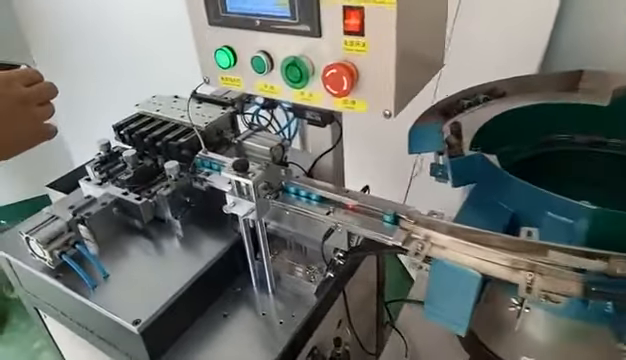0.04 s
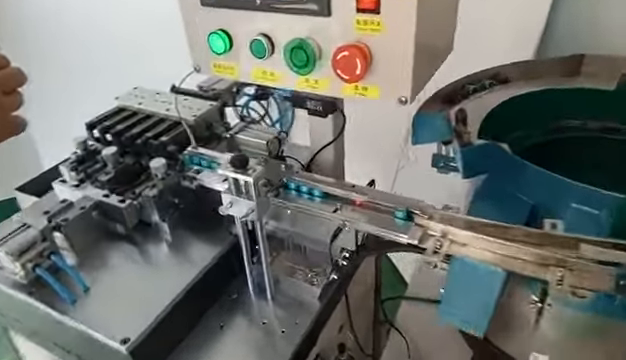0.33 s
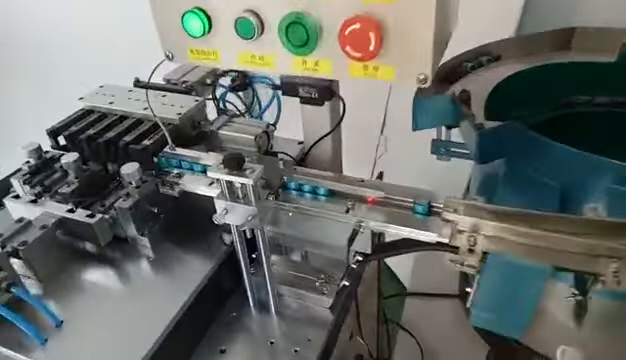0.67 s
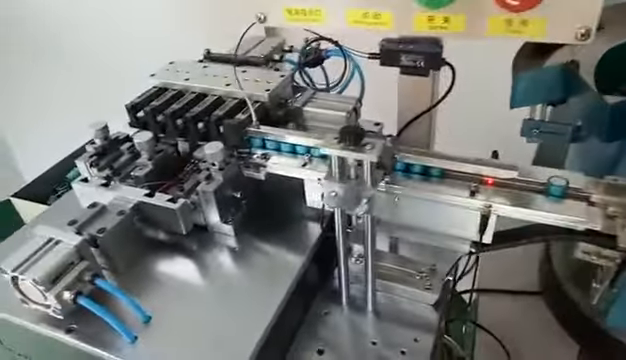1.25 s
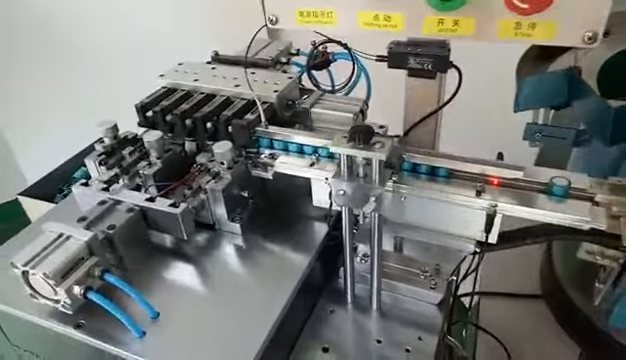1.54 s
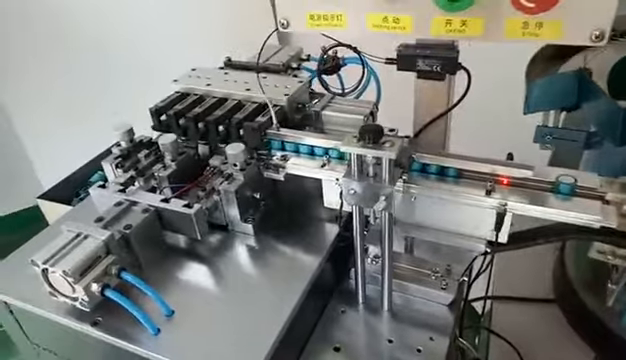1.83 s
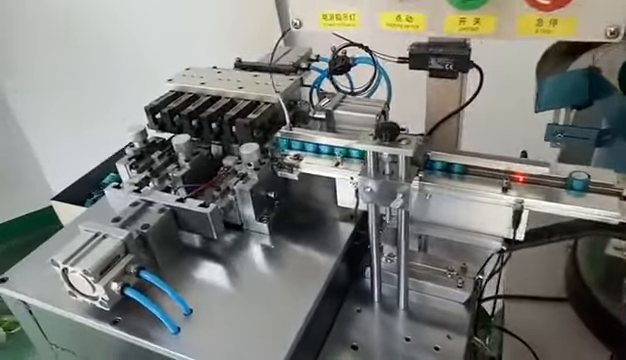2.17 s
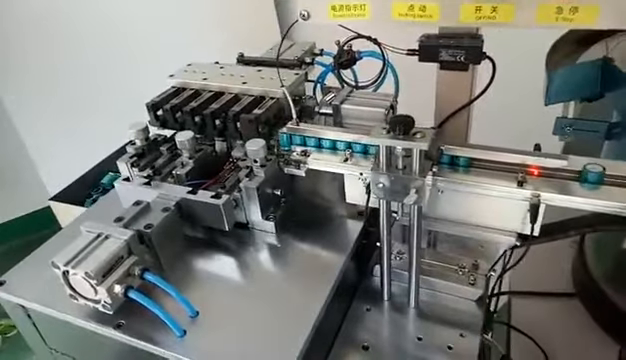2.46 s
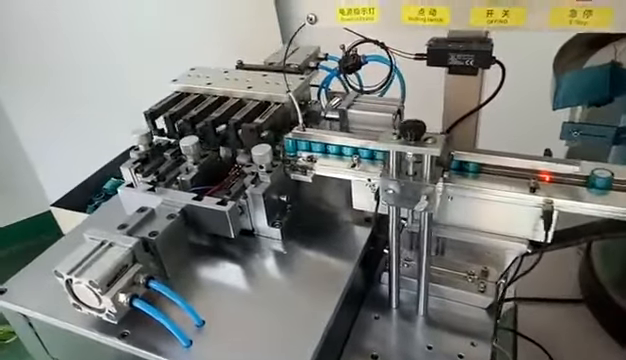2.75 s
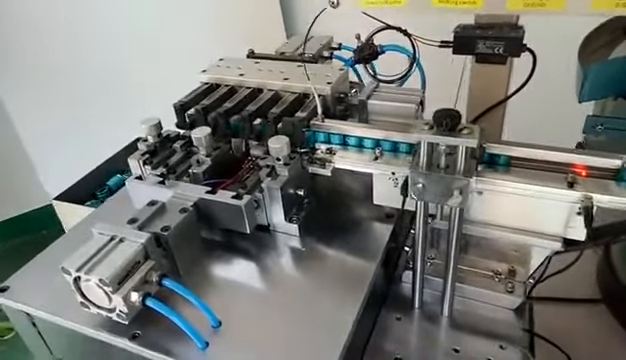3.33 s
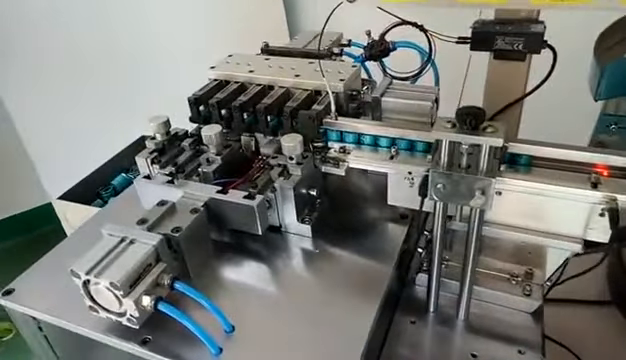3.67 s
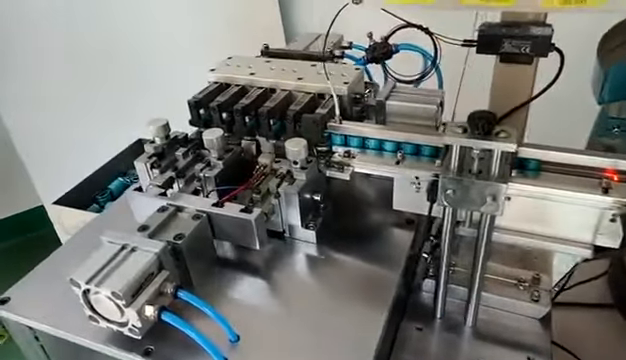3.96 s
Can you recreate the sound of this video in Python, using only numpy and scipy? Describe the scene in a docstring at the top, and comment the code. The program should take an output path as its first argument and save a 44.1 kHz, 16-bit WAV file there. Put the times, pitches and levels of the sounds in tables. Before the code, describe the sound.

A vibrating bowl feeder rattles small parts throughout, close by, over a low hum, with a fine sizzle mostly in the first two seconds. Air cylinders thump irregularly. A slide clacks at 1.1 seconds, steel tinks at 1.5, and the slide chatters with air puffs at 2 and 2.3. Two light pings follow after 3, a double clack at 3.5, then a thump and two puffs near 3.9.

```python
"""A bench assembly machine in a small workshop, heard from close by. From the start its bowl feeder
hums at multiples of the mains rate and tosses small parts, which rattle on the bowl and rail and
sizzle along the track. Air cylinders begin to thump, the slide clacks, and at 1.5 s a steel stop tinks.
After 2 s the slide chatters amid puffs of air. Past 3 s parts ping twice on the track and the slide
clacks twice more; a last thump and two puffs come just before 4 s, over the continuing rattle."""
import sys
import numpy as np
from scipy import signal
from scipy.fft import rfft, irfft, next_fast_len
from scipy.io import wavfile
from scipy.ndimage import map_coordinates

SR = 44100
rng = np.random.default_rng(int(sys.argv[2]) if len(sys.argv) > 2 else 0)


def master(y):
    """Save y as 16-bit WAV."""
    cut = np.clip(np.atleast_2d(y).T, -1, 1)
    pcm = np.round(cut * 32767)  # scale
    wavfile.write(sys.argv[1], SR, pcm.astype(np.int16))


N = 176400
T = np.arange(N) / SR
MAINS_HZ = 50


# brief dips in the rattle (time [s], depth [dB], half-width [s])
RATTLE_DIPS = [(1.125, 2, .02), (1.492, 3, .006), (2.015, 7, .009), (2.695, 5.5, .018), (2.825, 2.5, .012),
               (3.893, 3.5, .005)]
def rattle():
    """Superposition: rail and bowl sum to one din, whose colour shifts and whose level dips briefly."""
    din = shifting_colour(rail() + bowl(), span_hz=62, span_s=.08)
    dip_db = sum(depth * np.exp(-((T - s) / width) ** 2) for s, depth, width in RATTLE_DIPS)
    return din * amp(-dip_db)


# modes of the bowl (frequency [Hz], bandwidth [Hz], relative level [dB])
BOWL_MODES = [(2347, 30, -2), (2476, 16, 2), (2530, 26, 3), (2707, 28, 3), (2917, 22, 1), (2965, 20, 1),
              (3125, 28, 4), (3235, 28, 0), (3385, 24, -2), (3460, 26, 4), (3612, 20, 1), (3757, 24, 4),
              (4095, 26, 2), (4205, 26, 0), (4320, 26, -5), (4839, 30, -9)]
# spectrum of parts colliding (frequency [Hz], relative density [dB])
CLATTER_SPECTRUM = [(300, -18.5), (560, -17.5), (900, 1.5), (1150, 5.5), (1330, 0), (1650, 0.5), (2250, -4),
                    (2900, 4.5), (3400, 2), (4200, 0), (4700, -2.5), (5600, -11.5), (6500, -26),
                    (7600, -46.5)]
# balance across the spectrum (frequency [Hz], left minus right [dB])
BOWL_BAND_BALANCE = [(500, 5), (1500, 1.5), (2100, 0), (2500, 3), (3400, 1), (4000, -4.5), (4500, 2.5),
                     (5300, -8.5), (6100, 11.5), (7000, -3)]
# envelope of the bowl and its parts (time [s], level [dB])
BOWL_ENVELOPE = [(0.0, -22.5), (0.33, -23), (1.09, -22.5), (1.12, -24), (1.24, -22.5), (1.6, -25.5),
                 (1.69, -23.5), (1.92, -24), (2.65, -22.5), (2.7, -21.5), (2.73, -23), (2.94, -24),
                 (2.96, -20.5), (3.05, -24), (3.42, -22), (3.5, -23.5), (3.99, -23.5), (4.0, -21)]
# balance as the listener moves along the bench (time [s], left minus right [dB])
BOWL_BALANCE = [(0, 0.5), (.5, -1), (1.3, -1.5), (1.8, 0.5), (2.25, -2), (2.6, 0.5), (4, 0.5)]
def bowl():
    """Impact excitation: tossed parts ring the bowl's modes, clatter against each other and jingle."""
    ring = stereo_field(landings(surge_db=1.55), resonances(BOWL_MODES))
    clatter = stereo_field(landings(surge_db=.56), lambda hz: amp(along(CLATTER_SPECTRUM, hz)))
    mix = ring * amp(-.16) + clatter * amp(.97) + jingle() * amp(-4.5)
    placed = filtered(mix, lambda hz: pan(along(BOWL_BAND_BALANCE, hz)))
    return placed * amp(curve(BOWL_ENVELOPE)) * pan(curve(BOWL_BALANCE))


# modes of the feed rail (frequency [Hz], bandwidth [Hz], relative level [dB])
RAIL_MODES = [(597, 10, 0), (638, 20, 4), (705, 11, 4), (752, 26, 4), (899, 9, 0), (1095, 34, 2),
              (1394, 13, 4), (1442, 22, 2), (1485, 10, 0), (1695, 11, 0), (1786, 14, 5), (1840, 14, 7),
              (2020, 20, 4.5), (2072, 18, 1), (2137, 15, 1.5)]
# envelope of the rail (time [s], level [dB])
RAIL_ENVELOPE = [(0, -26), (.4, -24), (1.0, -24), (1.35, -24), (1.52, -26), (1.75, -24.5), (1.96, -27),
                 (2.06, -24), (2.37, -23), (2.45, -25), (3.0, -23.5), (3.4, -23.5), (4, -24.5)]
# balance as the listener moves along the bench (time [s], left minus right [dB])
RAIL_BALANCE = [(0, 6), (1.9, 5), (2.5, 15.5), (4, 14)]
def rail():
    """Resonance: the feed rail filters a stream of impacts through its modes."""
    ring = stereo_field(landings(surge_db=.55), resonances(RAIL_MODES))
    return ring * pan(curve(RAIL_BALANCE)) * amp(curve(RAIL_ENVELOPE))


def landings(surge_db, base_per_s=5000, bunching=.26, delay_s=.0022, spread_db=2.5):
    """Shot noise: tossed parts land at random, bunched once in each shake of the feeder."""
    rate = base_per_s * np.exp(bunching * np.cos(2 * np.pi * MAINS_HZ * (T - delay_s)))
    size = rng.choice([-1, 1], (2, N)) * amp(spread_db * rng.standard_normal((2, N)))
    hits = rng.random((2, N)) < rate / SR
    return hits * size * amp(surge_db * wobble(21.9))


def jingle(count=600, low_hz=1362, high_hz=4257, t60=.16):
    """Damped free vibration: single parts land harder and ring briefly, each at its own pitch."""
    t = np.arange(SR // 6) / SR
    out = np.zeros((2, N + SR))
    for when, side, pitch, size in rng.random((count, 4)):
        hz = low_hz + (high_hz - low_hz) * pitch
        channel_phase = np.array([[0], [2 * np.pi * side]])
        ring = np.sin(2 * np.pi * hz * t + channel_phase) * amp(-60 * t / t60)
        start = int(when * N)
        out[:, start:start + len(t)] += size ** 2 * ring
    return unit(out[:, :N])


# how far the rattle's colour shifts (frequency [Hz], scale of the swings [dB])
COLOUR_DEPTH = [(900, .8), (1400, 2.3), (3500, 2.3), (4100, 3), (5200, 1.2)]
def shifting_colour(x, span_hz, span_s):
    """Random amplitude modulation: narrow bands swell and drop out."""
    hz, t, bands = signal.stft(x, SR, nperseg=1024, noverlap=768)
    grid = np.meshgrid(hz / span_hz, t / span_s, indexing="ij")
    field = map_coordinates(rng.standard_normal((400, 200)), grid, mode="wrap")
    swing = field - np.minimum(field, 0) ** 2  # troughs go further than crests
    gain = amp(along(COLOUR_DEPTH, hz)[:, None] * swing)
    gain = gain / np.sqrt(np.mean(gain ** 2, axis=1, keepdims=True))
    return signal.istft(bands * gain, nperseg=1024, noverlap=768)[1][:, :N]


# cylinder strokes (time [s], relative level [dB], tilt of the ring [dB/octave])
STROKES = [(.32, -25, 0), (1.06, -24, 0), (1.463, -15.5, 1.5), (1.657, -19, -2), (2.07, -24, -1),
           (2.256, -14.5, 1.5), (2.742, -26, -1), (2.955, -21, 1.5), (3.862, -17, 1.5)]
# spectrum of the thud (frequency [Hz], relative density [dB])
THUD_SPECTRUM = [(35, -27.5), (70, -19), (105, -6.5), (180, -24), (280, 0), (400, -14.5), (680, -9.5),
                 (1200, -36), (4000, -58.5)]
# modes of the bench (frequency [Hz], relative level [dB], t60 [s])
BENCH_MODES = [(103, 0, .13), (150, -7, .08), (225, -5, .08), (305, -5, .08), (660, -9, .13)]
def cylinder_thumps(attack_s=.003):
    """Structure-borne sound: each stroke of an air cylinder thuds into the bench and rings its modes."""
    thud = amp(-6) * noise(THUD_SPECTRUM)
    out = np.zeros((2, N))
    for start, db, tilt in STROKES:
        ring = amp(-1) * strike(BENCH_MODES, start, tilt, attack_s)
        out += amp(db) * (thud * burst(start, attack_s, t60=.16) + ring)
    return out


# blows of the slide (time [s], chatter level [dB], ring level [dB], hold [s], tilt [dB/octave])
SLIDE_BLOWS = [(1.104, -19, -17, .006, 2.5), (2.023, -19.5, -28, .034, -3.5), (2.29, -22.5, -28, .07, -6),
               (3.502, -18.5, -12, .01, 0), (3.535, -22, -22, .008, -1)]
# spectrum of the chatter (frequency [Hz], relative density [dB])
CHATTER_SPECTRUM = [(150, -22), (330, -7), (480, -7), (680, -2), (880, -5), (1040, 4), (1180, -2),
                    (1350, 0), (2000, -5), (3200, -14), (7000, -32)]
# modes of the slide (frequency [Hz], relative level [dB], t60 [s])
SLIDE_MODES = [(335, -12, .1), (660, -11, .1), (1015, -2, .11), (1052, 0, .13), (1175, -8, .14),
               (1330, -7, .16), (1630, -6, .08), (1830, -9, .08), (2075, -9, .12)]
def slide_clacks():
    """Impact noise: the slide hits its stops, chatters over a broad band and rings."""
    out = np.zeros((2, N))
    for start, chatter_db, ring_db, hold, tilt in SLIDE_BLOWS:
        chatter = noise(CHATTER_SPECTRUM, tilt) * burst(start, attack_s=.001, t60=.11, hold_s=hold)
        out += amp(chatter_db) * chatter + amp(ring_db) * strike(SLIDE_MODES, start, tilt)
    return out * pan(balance_db=3)


# releases of air (time [s], level [dB])
AIR_RELEASES = [(2.022, -17), (2.285, -23), (3.868, -24), (3.899, -18)]
# spectrum of the air (frequency [Hz], relative density [dB])
AIR_SPECTRUM = [(700, -31), (1500, -1), (2100, 15.5), (3000, 5), (5000, 14), (6400, -9), (7600, -22)]
def valve_puffs():
    """Jet noise: the valves spit air in sudden, quickly decaying bursts."""
    envelope = sum(amp(db) * burst(start, attack_s=.0005, t60=.11) for start, db in AIR_RELEASES)
    return noise(AIR_SPECTRUM) * envelope


# modes of the steel stop (frequency [Hz], relative level [dB], t60 [s])
STOP_MODES = [(2080, 0, .12), (4775, -3, .04), (5060, -4, .05), (5600, -5, .025), (6056, -4, .05),
              (6200, 0, .05), (6520, -7, .03)]
def stop_tink():
    """Inharmonic modes: a steel stop, struck once, gives a short, high tink."""
    return amp(-17) * strike(STOP_MODES, start=1.499)


# knocks on the track (time [s], level [dB])
TRACK_KNOCKS = [(3.068, -23), (3.312, -30)]
def track_pings(hz=4840, t60=.14):
    """Decay of a single mode: a part knocks the steel track on the right and rings above the rattle."""
    rings = sum(amp(db) * strike([(hz, 0, t60)], start) for start, db in TRACK_KNOCKS)
    return rings * pan(balance_db=-14)


# spectrum of sliding parts (frequency [Hz], relative density [dB])
SIZZLE_SPECTRUM = [(2500, -48), (4300, 9), (5100, 11), (5750, 11.5), (6100, 1.5), (6500, 4.5),
                   (7100, -23.5), (7600, -24)]
# envelope of the sizzle (time [s], relative level [dB])
SIZZLE_ENVELOPE = [(0, -27), (.45, -29.5), (.7, -32.5), (1.15, -29.5), (1.4, -28), (1.85, -27.5),
                   (2.0, -36), (2.27, -33), (2.4, -41), (2.85, -64.5), (3.05, -27), (3.2, -45),
                   (3.7, -45.5), (4, -39.5)]
# drift from left to right (time [s], left minus right [dB])
SIZZLE_BALANCE = [(0, 15), (1.05, 20), (1.4, 4.5), (1.8, 5.5), (2.1, -6), (2.5, -1), (4, -4)]
def track_sizzle():
    """Friction noise: the tiny contacts of parts sliding along the track merge into a fine sizzle."""
    sizzle = stereo_field(landings(surge_db=3), lambda hz: amp(along(SIZZLE_SPECTRUM, hz)))
    return sizzle * pan(curve(SIZZLE_BALANCE)) * amp(curve(SIZZLE_ENVELOPE) - 1)


# harmonics of the hum (multiple of the mains [1], relative level [dB], left minus right [dB])
HUM_HARMONICS = [(1, -49.5, 1.5), (2, -50.5, -7.8), (3, -40.5, 0.5), (4, -39.5, 1), (5, -46, 5.5),
                 (7, -32.5, 2.5), (10, -41, 9.5), (12, -52, 4.5)]
# the hum grows as the listener comes closer (time [s], gain [dB])
HUM_ENVELOPE = [(0, -6), (.25, -4), (.4, -.5), (1.25, 3.5), (1.8, 0), (2.5, -2.5), (3.3, -.5), (4, -1.5)]
# build-up of the bouncing parts' tone (time [s], level [dB])
BOUNCE_ENVELOPE = [(0, -41), (.7, -45.5), (1.3, -32.5), (2.2, -34), (2.9, -36), (3.3, -32.5), (4, -35)]
def feeder_hum(wavers_per_s=14):
    """Forced vibration: the magnet shakes the bench; parts bouncing every second cycle add a tone."""
    def partial(multiple, db, balance_db, waver_db):
        gain = pan(balance_db) * amp(db + waver_db * wobble(wavers_per_s))
        return gain * np.sin(2 * np.pi * (multiple * MAINS_HZ * T + rng.random()))

    harmonics = sum(partial(k, db, balance, waver_db=1.3) for k, db, balance in HUM_HARMONICS)
    # period doubling gives a half-integer multiple of the mains
    bounce = partial(8.5, curve(BOUNCE_ENVELOPE), balance_db=7, waver_db=2)
    return harmonics * amp(curve(HUM_ENVELOPE)) + bounce


# spectrum of the rumble (frequency [Hz], relative density [dB])
RUMBLE_SPECTRUM = [(20, -24), (45, -9), (70, -12.5), (110, 1), (175, -8.5), (220, 2.5), (310, -5),
                   (450, -5), (700, -4), (1100, -10), (2500, -54.5)]
# envelope of the rumble (time [s], level [dB])
RUMBLE_ENVELOPE = [(0, -32.5), (1.3, -34.5), (1.65, -30.5), (1.92, -32), (2.15, -30), (2.5, -33.5),
                   (3.1, -36), (4, -33.5)]
def rumble(waver_db=.8):
    """Random vibration: the machine gives off a low, slowly wavering noise."""
    return noise(RUMBLE_SPECTRUM) * amp(curve(RUMBLE_ENVELOPE) + waver_db * wobble(2.5))


# likeness of left and right (frequency [Hz], correlation before clipping to -1..1 [1])
ROOM_CORRELATION = [(100, 6.8), (250, 4), (500, 0.3), (1000, 0.3), (1500, 0.12), (2600, -0.1), (3300, 0.1),
                    (3900, 0.16), (7000, -0.34)]
def stereo_field(pair, response):
    """Partial coherence: two unrelated signals are coloured and blended as mid and side; rms 1."""
    def mid_side_response(hz):
        angle = np.arccos(np.clip(along(ROOM_CORRELATION, hz), -1, 1)) / 2
        return response(hz) * np.array([np.cos(angle), np.sin(angle)])

    mid, side = filtered(pair, mid_side_response)
    return unit(np.array([mid + side, mid - side]))


def noise(spectrum, tilt_db=0):
    """Spectral shaping: white stereo noise takes on a spectrum, tilted per octave."""
    white = rng.standard_normal((2, N))
    return stereo_field(white, lambda hz: amp(along(spectrum, hz) + tilt_db * np.log2(1 + hz / 100)))


def resonances(modes):
    """Frequency response of a body: a sum of second-order resonators."""
    return lambda hz: sum(amp(db) * 1j * hz * width / (centre ** 2 - hz ** 2 + 1j * hz * width)
                          for centre, width, db in modes)


def strike(modes, start, tilt_db=0, attack_s=.001):
    """Modal superposition: a struck body rings as decaying sines; rms 1 before their envelopes."""
    t = np.maximum(T - start, 0)
    gains = amp([db + tilt_db * np.log2(hz) for hz, db, t60 in modes])
    ring = sum(gain * np.sin(2 * np.pi * hz * t) * burst(start, attack_s, t60)
               for gain, (hz, db, t60) in zip(gains, modes))
    return ring / np.sqrt(np.sum(gains ** 2) / 2)


def burst(start, attack_s, t60, hold_s=0):
    """Exponential envelope: it rises, holds, then falls 60 dB in t60 seconds."""
    t = np.maximum(T - start, 0)
    return (1 - np.exp(-t / attack_s)) * amp(-60 * np.maximum(t - hold_s, 0) / t60)


def filtered(x, response):
    """Linear filtering: the spectrum of x times a frequency response."""
    size = next_fast_len(N + SR // 2)
    return irfft(rfft(x, size) * response(np.fft.rfftfreq(size, 1 / SR)), size)[..., :N]


def pan(balance_db):
    """Constant-power panning: left and right gains for a level difference."""
    gains = amp(np.array([[.5], [-.5]]) * balance_db)
    return gains / np.sqrt(np.mean(gains ** 2, axis=0))


def wobble(knots_per_s):
    """Spline interpolation of random knots: a smooth random curve."""
    return map_coordinates(rng.standard_normal(800), [T * knots_per_s], mode="wrap")


def along(points, hz):
    """Interpolation of (frequency [Hz], value) points on a log axis."""
    knots_hz, values = np.transpose(points)
    return np.interp(np.log(hz + 1), np.log(knots_hz + 1), values)


def curve(points):
    """Interpolation of (time [s], value) points at every sample."""
    return np.interp(T, *np.transpose(points))


def amp(db):
    """Amplitude ratio of a level in decibels."""
    return 10 ** (np.asarray(db) / 20)


def unit(x):
    """Normalisation to rms 1."""
    return x / np.sqrt(np.mean(x ** 2) + 1e-20)


def scene():
    """Superposition: the feeder's continuous sound plus the transients of the machine's cycle."""
    continuous = rattle() + track_sizzle() + feeder_hum() + rumble()
    return continuous + cylinder_thumps() + slide_clacks() + valve_puffs() + stop_tink() + track_pings()


def record(dry):
    """Saturation and band limiting: the highest peaks are rounded and the top treble is cut."""
    ceiling, cutoff_hz, slope_width_hz = .75, 7480, 200
    soft = dry / (1 + (dry / ceiling) ** 6) ** (1 / 6)
    return filtered(soft, lambda hz: np.clip((cutoff_hz - hz) / slope_width_hz + .5, 0, 1))


dry = scene()
out = record(dry)
master(out)
```